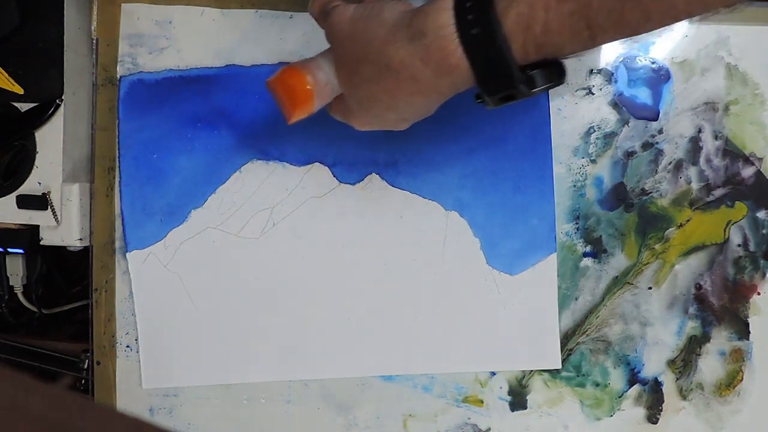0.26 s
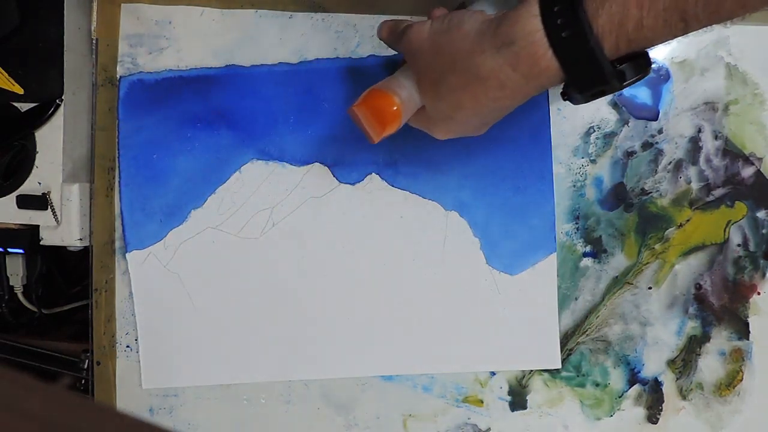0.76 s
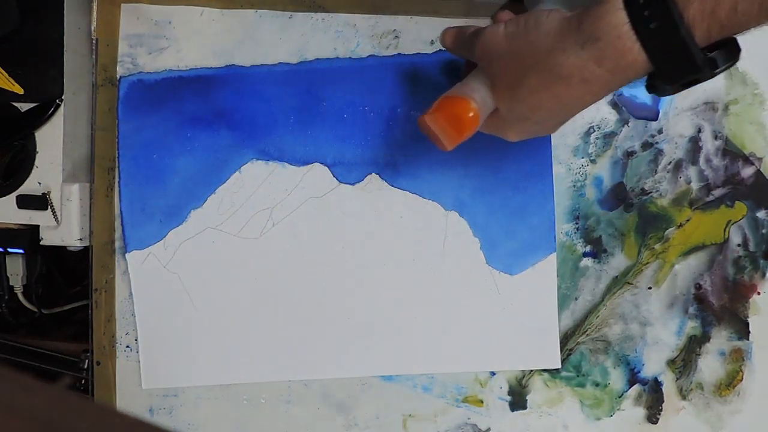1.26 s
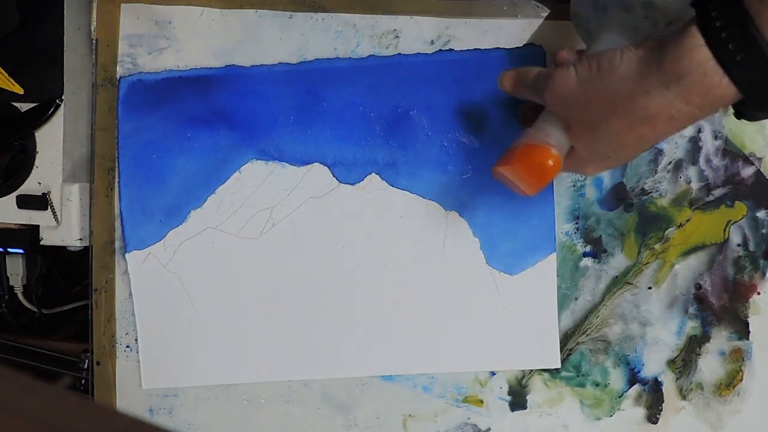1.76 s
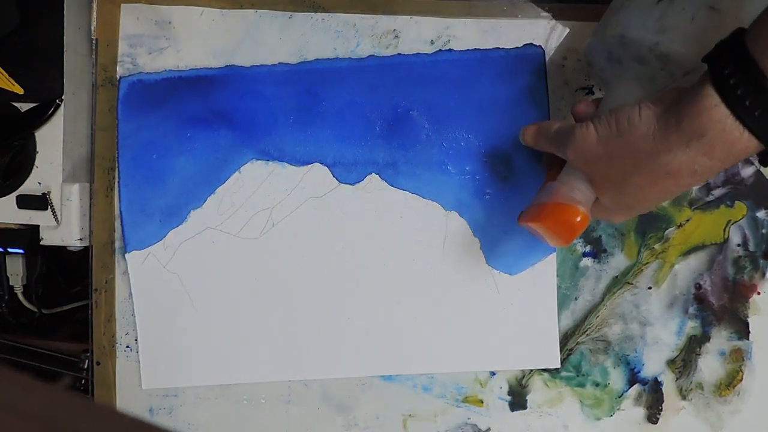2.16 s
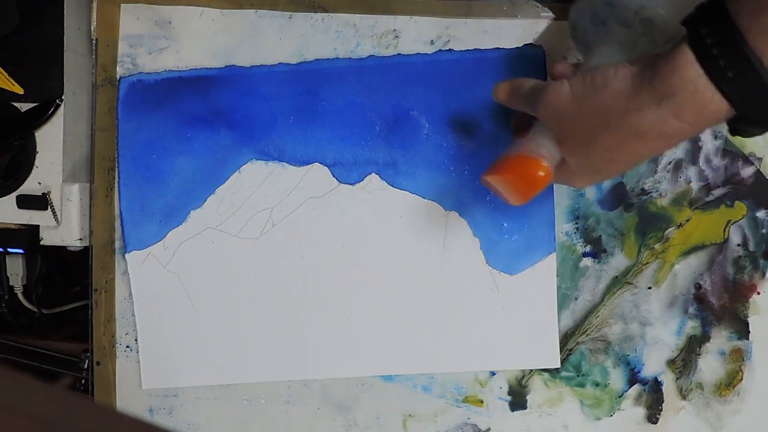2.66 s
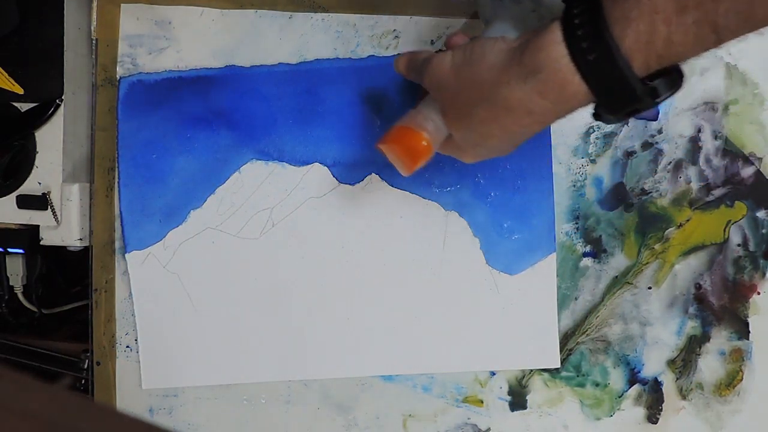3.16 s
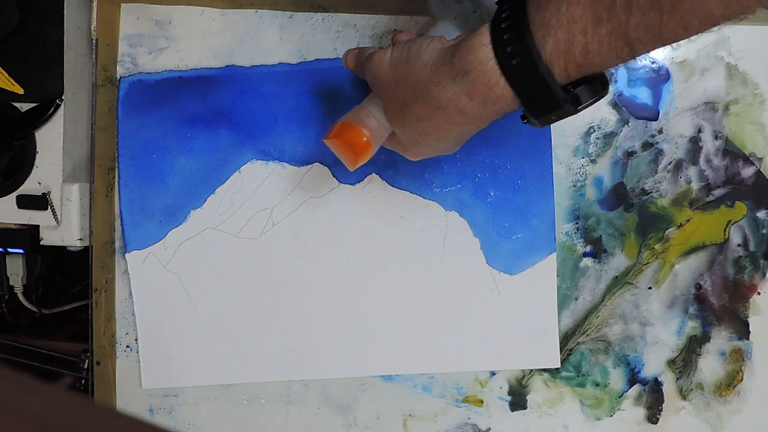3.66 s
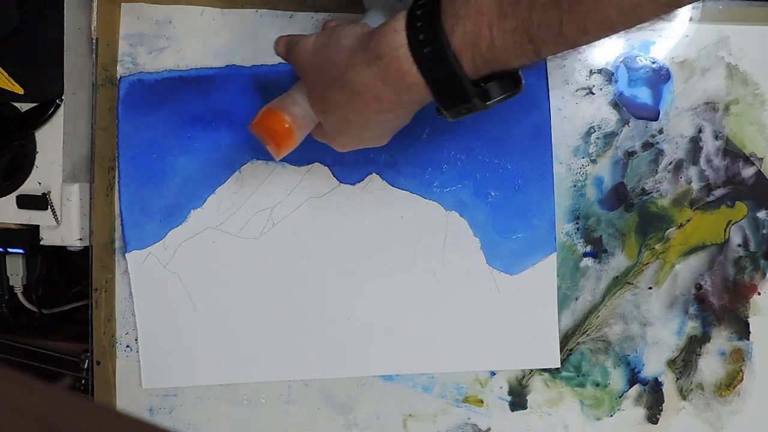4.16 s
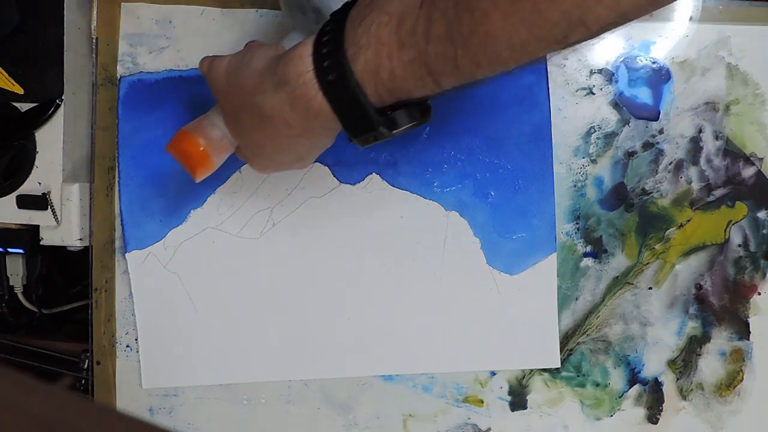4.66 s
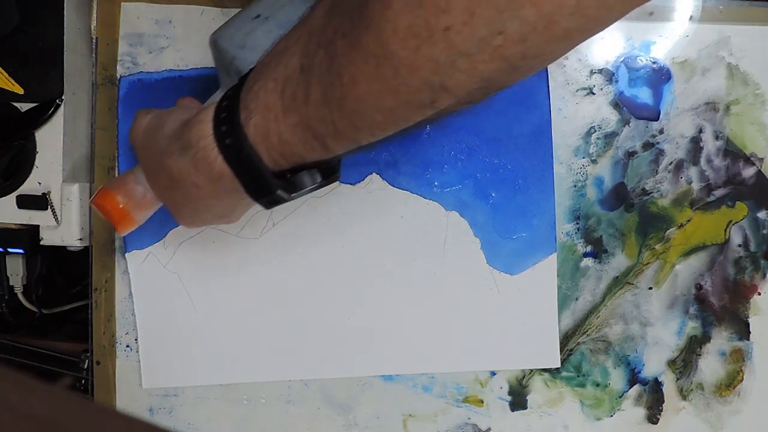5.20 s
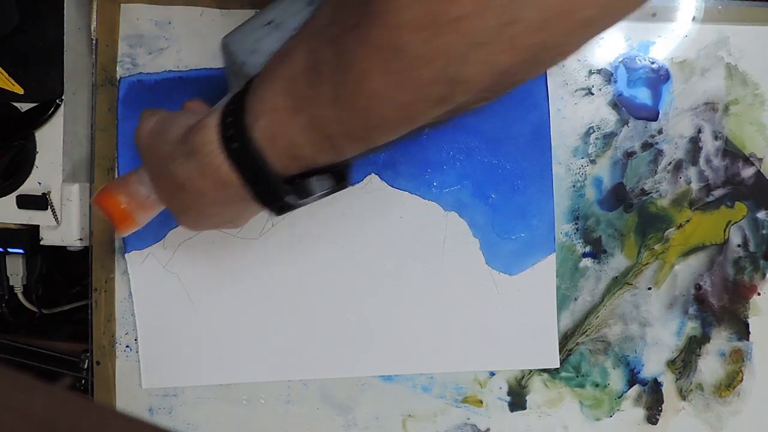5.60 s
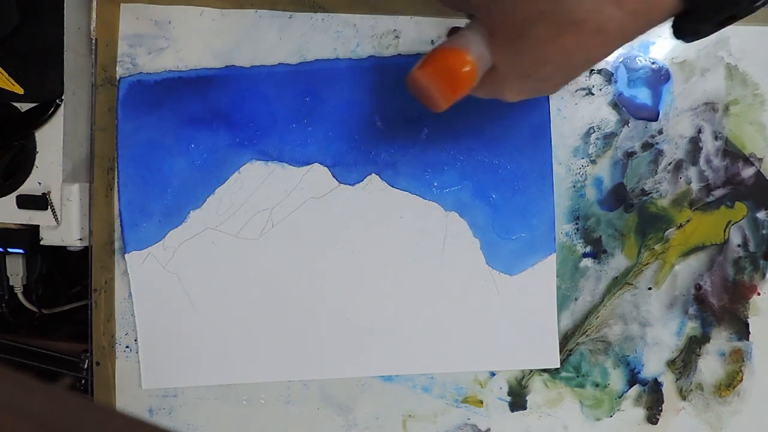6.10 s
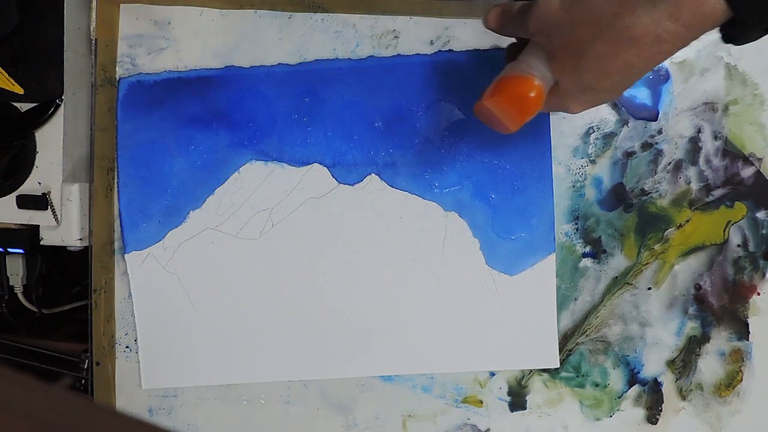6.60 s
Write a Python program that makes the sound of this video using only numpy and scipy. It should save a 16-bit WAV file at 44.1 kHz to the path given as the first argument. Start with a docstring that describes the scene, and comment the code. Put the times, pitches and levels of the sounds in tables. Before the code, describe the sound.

Close stereo microphones in a small room catch a spray bottle sweeping over paper on a desk. Crisp puffs of mist repeat regularly, drifting across to one side, back to the other, and finally returning. Soft plastic pump ticks surround them, with a brief gap after the seventh. Middle strokes are shorter, with more rush against the paper. Near the end come a blunt knock, a few ticks and a final bright squirt over faint hum.

```python
"""Sixteen short squirts of water mist, moved from side to side, over a sheet of paper on a desk.
Each is shaped noise: a nozzle hiss, and a lower resonant rush where the jet meets the paper.
The pump plunger ticks before and after each stroke as decaying sines; further pump ticks sound on their own.
There is one faint rising chirp and one hollow knock of summed modes; low-passed noise pushes as stirred air.
Each close sound except the air gets a diffuse noise tail; a small room's noise and hum lie faintly beneath."""
import sys
import numpy as np
from scipy import signal
from scipy.fft import rfft, irfft
from scipy.io import wavfile

SR = 44100
rng = np.random.default_rng(int(sys.argv[2]) if len(sys.argv) > 2 else 0)


def wrap_up_sound(samples):
    """Save the sound to the file named by the first command line argument, as 16-bit audio."""
    columns = np.atleast_2d(samples).T
    # keep every value between -1 and 1, then stretch to whole-number steps
    tamed = np.clip(columns, -1, 1)
    steps = np.round(tamed * 32767).astype(np.int16)
    wavfile.write(sys.argv[1], SR, steps)


N = 301644

# rush and stirred air at the two microphones: f/Hz, likeness/0-1
RUSH_LIKENESS = [(1200, 0.98), (3000, 0.74)]


def amp(db):
    """Decibels to gain."""
    return 10 ** (np.asarray(db) / 20)


def unit(x):
    """Scales to rms 1."""
    return x / np.sqrt(np.mean(x ** 2) + 1e-20)


def read(points, hz):
    """Interpolates a table on a log-frequency axis."""
    f, value = np.transpose(points)
    return np.interp(np.log(hz + 1), np.log(f + 1), value)


def add(mix, s, sound):
    """Mixes a stereo sound in at time s."""
    part = mix[:, round(s * SR):][:, :sound.shape[1]]
    part += sound[:, :part.shape[1]]


def panned(db):
    """Left and right gains for a left-over-right level difference."""
    return amp(np.array([[db], [-db]]) / 2)


def noise(gain, size):
    """Noise of rms 1 whose spectrum is shaped by gain(Hz)."""
    spectrum = rfft(rng.standard_normal(size))
    return unit(irfft(spectrum * gain(np.fft.rfftfreq(size, 1 / SR)), size))


def noise_pair(gain, likeness, size, side_db=0):
    """Noise of rms 1 at two microphones: partly alike, with a phase lead that follows the level difference."""
    # phase lead: f/Hz, lead/(rad per dB of left-right difference)
    lead = [(100, 0.5), (1200, 0.18), (3000, .5), (5500, 0.85), (8500, -0.18)]
    hz = np.fft.rfftfreq(size, 1 / SR)
    left, other = rfft(rng.standard_normal((2, size)))
    same = np.clip(read(likeness, hz), 0, 1)
    right = same * left + np.sqrt(1 - same ** 2) * other
    right = right * np.exp(-1j * side_db * read(lead, hz))
    return unit(irfft(np.array([left, right]) * gain(hz), size))


def flutter(hz, size):
    """Random wander of rms 1, mostly slower than hz."""
    return noise(lambda f: (f > 0) / (1 + (f / hz) ** 4), size)


def scattered(x, fade_s, count=60):
    """Early echoes off the desk and the things on it, different at each microphone."""
    t = np.arange(round(.02 * SR)) / SR
    taps = np.zeros((2, len(t)))
    at = rng.integers(20, len(t), (2, count))
    strengths = rng.choice([-1, 1], at.shape) * np.exp(-t[at] / fade_s)
    np.put_along_axis(taps, at, strengths, 1)
    taps /= np.linalg.norm(taps, axis=1, keepdims=True)
    return signal.fftconvolve(np.atleast_2d(x), taps, axes=1)[:, :x.shape[-1]]


def squirt(place, length_s, hiss_db, open_db, fine_db, rush_db):
    """The valve snaps open, pressure swells and sags, the valve shuts; the jet reaches the paper a moment later."""
    t = np.arange(round(.2 * SR)) / SR
    attack_s, release_s = 0.0035, 0.014  # attack at 0 dB opening pressure; slower under a gentle press
    side_db = .5 - 2.1 * place
    opening = np.clip(t / attack_s * amp(open_db), 0, 1)
    valve = opening * np.exp(-np.maximum(t - length_s, 0) / release_s)
    hiss = nozzle_hiss(t, valve, place, length_s, hiss_db, open_db, fine_db, side_db)
    rush = paper_rush(t, valve, place, rush_db, side_db)
    return panned(side_db) * hiss + panned(0.89) * rush


def nozzle_hiss(t, valve, place, length_s, hiss_db, open_db, fine_db, side_db):
    """Spray noise combed by random short delays; pressure drives its level and finest fizz."""
    # nozzle spectrum: f/Hz, relative density/dB
    hiss_shape = [(200, -39.5), (1200, -10), (2000, -5.5), (2500, -6), (3150, -10), (4000, -1), (5000, -3),
                  (6000, -1.5), (8000, -3.5), (9500, -2), (11000, 1.5), (13000, 1.5), (15000, 1.5),
                  (16000, -4)]
    # hiss at the two microphones: f/Hz, likeness/0-1
    spray_likeness = [(1200, 0.7), (3000, 0.64), (5500, 0.86), (9000, 0.94), (14000, 1)]
    # fuller, duller colour near the left edge: f/Hz, gain at place -1/dB
    edge_colour = [(1500, -7), (2500, 7.5), (4000, 1), (8000, -2), (11000, 0), (15000, -6)]
    # thinning towards the right: f/Hz, gain at place 1/dB
    thinning = [(1500, -4), (3000, -3), (5000, -2), (8000, 1.5), (11000, 1.6), (15000, 2)]
    delay_gains, delay_min_s, delay_max_s = [0.38, 0.28, 0.12], 0.00011, 0.000694
    open_s, dip_s, top_s, hold_s = 0.0074, 0.01, 0.028, 0.033  # from the start of the stroke
    dip_db, sag_db = -1.5, -6.5

    def nozzle(f):
        """Random close delays cut broad notches, new each squirt; longer random delays add fine ripple."""
        close_s = rng.uniform(delay_min_s, delay_max_s, len(delay_gains))
        close = np.exp(-2j * np.pi * np.outer(f, close_s))
        longer = np.exp(-2j * np.pi * np.outer(f, rng.uniform(.001, .004, 4)))
        comb = abs(1 + close @ np.array(delay_gains)) * abs(1 + 0.11 * longer.sum(1))
        colour_db = min(place, 0) ** 2 * read(edge_colour, f) + max(place, 0) * read(thinning, f)
        mist_db = fine_db * np.clip((f - 7000) / 4000, 0, 1)
        return comb * amp(read(hiss_shape, f) + colour_db + mist_db)

    pressure_db = np.interp(t, [open_s, dip_s, top_s, hold_s, max(length_s, hold_s)],
                            [open_db, open_db + dip_db, 0, 0, sag_db])
    spray = noise_pair(nozzle, spray_likeness, len(t), side_db)
    fizz = signal.sosfilt(signal.butter(1, 8000, "high", fs=SR, output="sos"), spray)
    sputter = amp(1.0 * flutter(120, len(t)))
    # falling pressure takes the finest fizz away first
    body = (spray - fizz) * amp(0.78 * pressure_db)
    hiss = amp(hiss_db) * valve * sputter * (body + fizz * amp(1.8 * pressure_db))
    # on the left the hand hides the nozzle: more scattered against direct hiss
    scatter = amp(-7.5 - 4.5 * place)
    return (hiss + scatter * scattered(hiss, fade_s=0.0042)) / np.hypot(1, scatter)


def paper_rush(t, valve, place, rush_db, side_db):
    """The jet on the paper: the space between hand and paper picks out one broad resonance."""
    # rush spectrum: multiple of the resonance, relative density/dB
    rush_shape = [(.04, -2.5), (.12, -10.5), (.35, -15.5), (.55, -12.5), (.72, -3.5), (.9, 0.5), (1, 7),
                  (1.12, 2.5), (1.35, -1), (1.8, -9.5), (2.5, -14.5), (7, -26)]
    # resonance climbs as the bottle moves right: place, f/Hz
    rush_pitch = [(-0.64, 1063), (0.36, 1110), (0.55, 1480), (0.54, 1500)]
    resonance_hz = np.interp(place, *np.transpose(rush_pitch))
    rush = noise_pair(lambda f: amp(read(rush_shape, f / resonance_hz)), RUSH_LIKENESS, len(t), side_db)
    growth = np.interp(t, [.010, .02, .04, .055], [0.073, 0.74, 0.53, 0.37])
    arrival = growth * np.interp(t - .005, t, valve)  # 5 ms after the valve
    return amp(rush_db + 2.73 * flutter(146, len(t))) * arrival * rush


def plunger(db, length_s, place):
    """The tick at either end of a stroke: harder when the stroke is quick, clearer on the left."""
    quick_s, softer_db_per_s, db_per_place = 0.041, 198, -6
    level_db = db - softer_db_per_s * (length_s - quick_s) + db_per_place * place
    hz = 1350 * 2 ** (0.28 * rng.standard_normal())  # scatter in octaves
    return tick(level_db, hz, side_db=2.5)


def tick(db, hz, side_db):
    """The plunger catches in its sleeve: a tiny scrape, and the plastic rings for a few milliseconds."""
    # modes of the plastic pump: nominal multiple of the tick's pitch, level/dB, t60/s
    pump = [(1, -3, 0.017), (1.25, 0, 0.0098), (1.55, -4.5, 0.0087), (2, -5, 0.0056), (3.2, -20, 0.0054)]
    t = np.arange(SR // 10) / SR
    ring = 0
    for multiple, level_db, t60_s in pump:
        mode_hz = hz * multiple * rng.uniform(0.854, 1.21)
        ring = ring + amp(level_db - 60 * t / t60_s) * np.sin(2 * np.pi * mode_hz * t)
    scrape = noise(lambda f: 1 / (1 + (np.log((f + 1) / 1800) / 0.69) ** 4), len(t))
    scrape = scrape * np.exp(-t / 0.0021)
    ring = (ring + amp(-20) * scrape) * (1 - np.exp(-t / 0.0004))
    ring = amp(db + 3.5) * ring / abs(ring).max()
    return panned(side_db) * (ring + amp(-6.5) * scattered(ring, fade_s=0.034))


def chirp(db, hz, rise_hz_per_s, t60_s):
    """A faint rising tone that goes with a tick, over a soft low bump."""
    t = np.arange(SR // 8) / SR
    cycles = np.cumsum(hz + rise_hz_per_s * t) / SR
    tone = np.sin(2 * np.pi * cycles) * amp(db - 60 * t / t60_s)
    bump = np.sin(2 * np.pi * 200 * t) * amp(db + 10.5 - 60 * t / 0.032)
    ring = (tone + bump) * (1 - np.exp(-t / 0.0012))
    return ring + amp(-6) * scattered(ring, fade_s=0.01)


def knock(db):
    """A blunt blow: the high modes speak at once, the hollow body swells after them."""
    # modes of the knocked bottle: f/Hz, level/dB, t60/s, rise/s
    bottle = [(196, -1, 0.078, .003), (302, -7.5, 0.099, 0.0015), (499, 4, 0.083, 0.0056),
              (557, 7.5, 0.046, 0.0019), (710, -20, 0.07, 0.0011), (1360, -6.5, 0.038, 0.00049),
              (1690, -3.5, 0.023, .0003), (3750, -7, 0.019, .0002), (5350, -15, 0.043, .0002),
              (5740, -19, .03, .0002), (6420, -19, 0.039, .0002), (6930, -13, 0.045, .0002)]
    t = np.arange(SR // 5) / SR
    ring = 0
    for hz, level_db, t60_s, rise_s in bottle:
        envelope = amp(db + level_db - 60 * t / t60_s) * (1 - np.exp(-t / rise_s))
        ring = ring + envelope * np.sin(2 * np.pi * hz * t)
    return ring + amp(-10) * scattered(ring, fade_s=0.0074)


def draught(length_s, db):
    """A soft push of air: nearly all of it lies below the lowest audible notes."""
    size = round(max(length_s, .05) * SR)
    eddies = noise_pair(lambda f: 1 / (1 + (f / 11) ** 2.0), RUSH_LIKENESS, SR)[:, :size]
    return amp(db) * (0.64 + 0.43 * eddies) * signal.windows.tukey(size, .6)


def room(x):
    """A diffuse tail, each band dying at its own speed."""
    # ring of the room: f/Hz, t60/s
    ring_times = [(150, 0.43), (1000, 0.36), (4000, 0.29), (9000, 0.29), (15000, 0.18)]
    hz, t, z = signal.stft(rng.standard_normal((2, SR // 2)), SR, nperseg=256)
    decay = amp(-60 * t / read(ring_times, hz)[:, None])
    tail = signal.istft(z * decay, SR, nperseg=256)[1]
    tail = tail * np.clip(np.arange(tail.shape[1]) / SR / 0.0062, 0, 1)
    return signal.fftconvolve(x, tail / np.linalg.norm(tail[0]), axes=1)[:, :N]


def background():
    """Soft room noise and a slightly wavering hum swell and sink together."""
    # room noise spectrum: f/Hz, relative density/dB
    air_shape = [(22, -2), (34, -23), (60, -10), (140, -13), (215, -10), (270, -17), (360, -14), (600, -17),
                 (900, -14.5), (1440, -19.5), (2670, -24), (3840, -31.5), (12000, -37.5), (16000, -44.5)]
    # room noise at the two microphones: f/Hz, likeness/0-1
    air_likeness = [(60, 0.5), (250, 0.4), (700, 0.45), (1800, 0), (6000, 0.96)]
    # room noise, before the pan: t/s, level/dB
    air_level = [(0.0, -58.5), (1.22, -63), (1.58, -60.5), (2.1, -64.5), (3.11, -60.5), (3.35, -62.5),
                 (3.9, -54.5), (4.42, -58), (5.18, -55.5), (6.51, -55.5), (6.69, -61), (6.84, -62)]
    # hum: f/Hz, mean level against the room noise/dB
    hum_tones = [(24, -16), (47, -13.5), (120, -9.5), (186, -19.5), (208, -21.5)]
    t = np.arange(N) / SR
    air = noise_pair(lambda f: amp(read(air_shape, f)), air_likeness, N)
    hum = 0
    for hz, db in hum_tones:
        level = amp(db + 1.0 * flutter(9.2, N)) * np.sqrt(2)
        hum = hum + level * np.sin(2 * np.pi * hz * t + 0.11 * flutter(12.0, N))
    return panned(1.0) * amp(np.interp(t, *np.transpose(air_level))) * (air + hum)


def scene():
    """Each stroke is a tick, a squirt with its puff of air, and a tick; then further ticks, knock and room."""
    # squirts: t/s, stroke length/s, hiss/dB, opening pressure/dB, mist fineness/dB, rush on the paper/dB
    squirts = [(.175, 0.095, -36, -3, 0.5, -44.5), (0.55, 0.088, -35, -0.7, 3.5, -46),
               (.936, .092, -34, -2.5, 3.5, -48.5), (1.321, 0.092, -34.8, -1, 2, -46),
               (1.7, 0.1, -34.5, -1.5, 1, -47), (2.064, 0.099, -36.5, -2, 0.5, -46),
               (2.42, .1, -39.5, -8, -4, -49.5), (3.022, 0.084, -35.5, -1, 0, -43.5),
               (3.42, 0.07, -38, -0.5, -0.5, -49.5), (3.819, 0.05, -37, 2, -2, -42.7),
               (4.166, .057, -34.5, -2.5, -2, -39), (4.551, .057, -36, -3, 2, -39),
               (4.904, .049, -36, -5.5, 2, -43.5), (5.254, 0.063, -35, -2.7, 0, -42.5),
               (5.628, 0.064, -36, 1, 0.5, -45), (6.579, 0.088, -32.5, 1.5, 3, -40)]
    # hand over the sheet: t/s, place/(-1 left to 1 right)
    places = [(0, -0.47), (1.8, 0.83), (2.5, 1), (3.8, -0.34), (5.25, -1.03), (5.7, -0.99), (6.0, 0.0074),
              (6.84, 0.54)]
    # further ticks of the pump: t/s, level/dB, f/Hz, left-right/dB
    ticks = [(2.6412, -49.5, 1380, 3), (5.339, -44, 1270, 0), (6.2078, -34.5, 1317, 0.5),
             (6.455, -44.5, 1300, 0), (6.545, -45, 1260, 2)]
    # rising chirp: t/s, tone level/dB, starting f/Hz, rise/(Hz/s), t60/s
    chirps = [(2.641, -59, 1700, 24000, .08)]
    # hollow knock: t/s, level/dB
    knocks = [(5.8003, -38)]
    # air stirred as the hand sweeps across: t/s, length/s, nominal level/dB
    draughts = [(2.824, 0.24, -52.5), (3.42, 0.47, -50), (6.552, .28, -46.5)]
    press_lead_s, return_lag_s = .045, .085  # before opening, after shutting
    press_db, return_db = -49.5, -50  # for a quick stroke at mid-sheet
    puff_db, puff_extra_s = -12, 0.058  # against the rush, beyond the stroke

    near, wind = np.zeros((2, 2, N))
    for s, length_s, hiss_db, open_db, fine_db, rush_db in squirts:
        place = np.interp(s, *np.transpose(places))
        add(near, s - press_lead_s, plunger(press_db, length_s, place))
        add(near, s, squirt(place, length_s, hiss_db, open_db, fine_db, rush_db))
        add(wind, s, draught(length_s + puff_extra_s, rush_db + puff_db))
        add(near, s + length_s + return_lag_s, plunger(return_db, length_s, place))
    for s, *row in ticks:
        add(near, s, tick(*row))
    for s, *row in chirps:
        add(near, s, chirp(*row))
    for s, db in knocks:
        add(near, s, knock(db))
    for s, *row in draughts:
        add(wind, s, draught(*row))
    return near + amp(-15.5) * room(near) + background() + panned(15.5) * wind


def record(dry):
    """Linear-phase low-pass: a steep upper band limit."""
    edge_hz = 15950
    lowpass = signal.firwin(401, edge_hz, window=("kaiser", 8), fs=SR)
    return signal.oaconvolve(dry, lowpass[None], "same")


dry = scene()
out = record(dry)
wrap_up_sound(out)
```